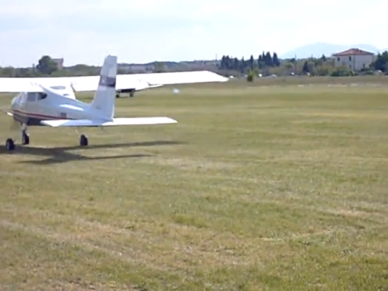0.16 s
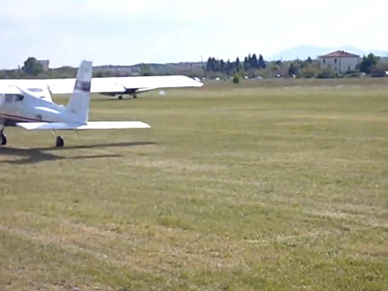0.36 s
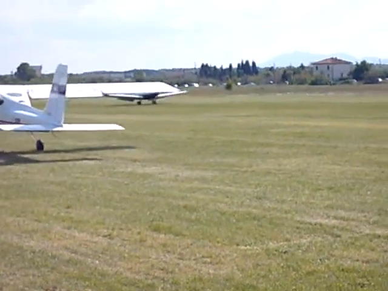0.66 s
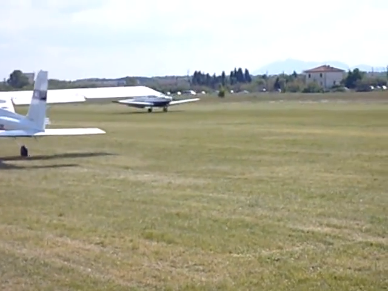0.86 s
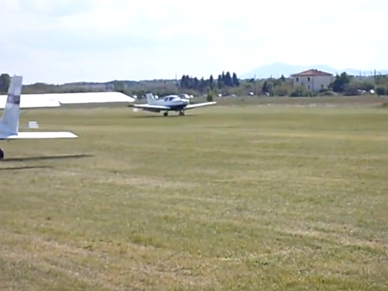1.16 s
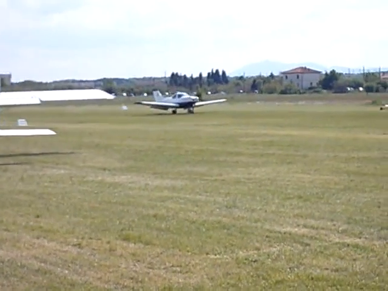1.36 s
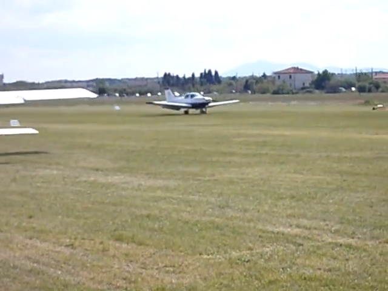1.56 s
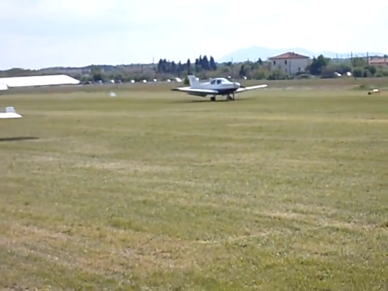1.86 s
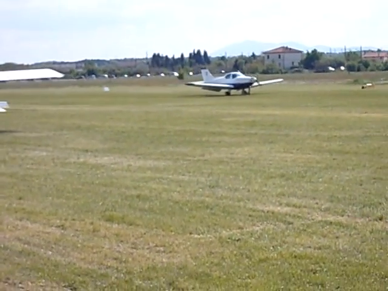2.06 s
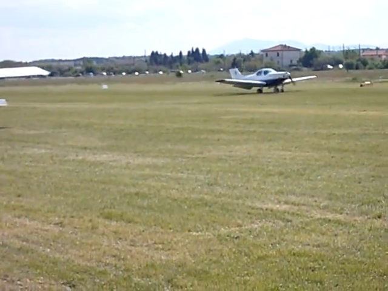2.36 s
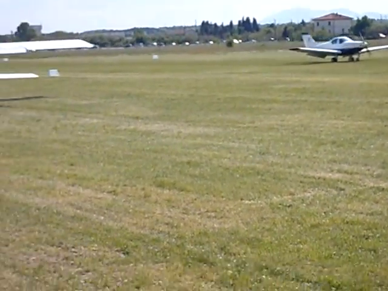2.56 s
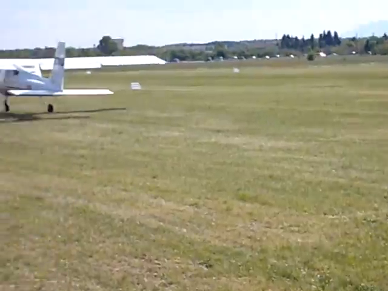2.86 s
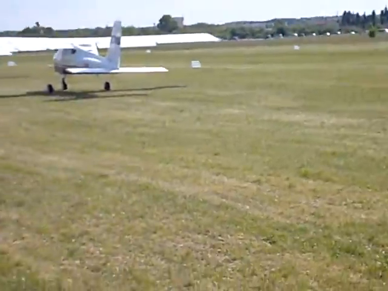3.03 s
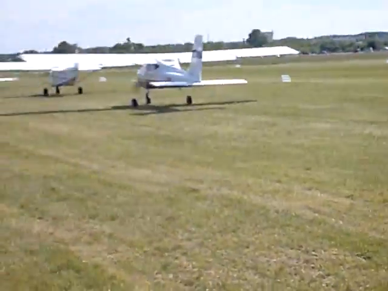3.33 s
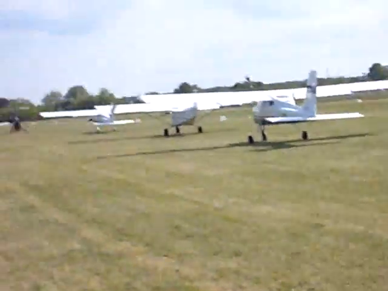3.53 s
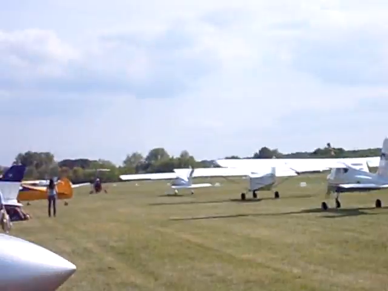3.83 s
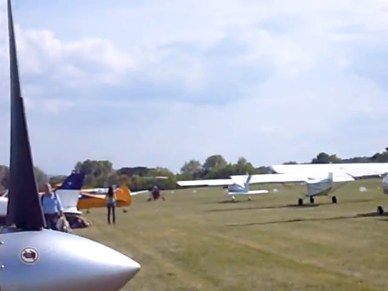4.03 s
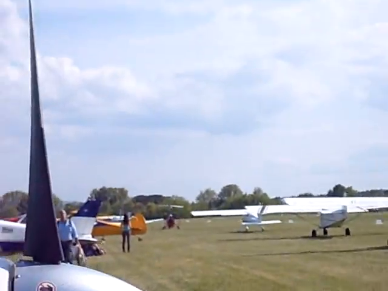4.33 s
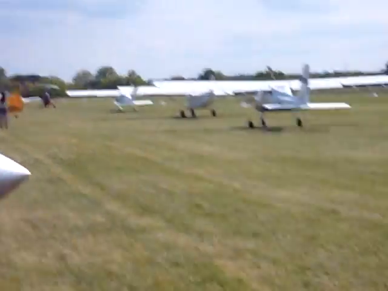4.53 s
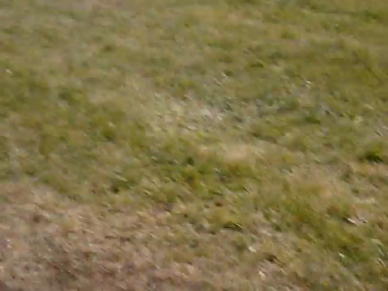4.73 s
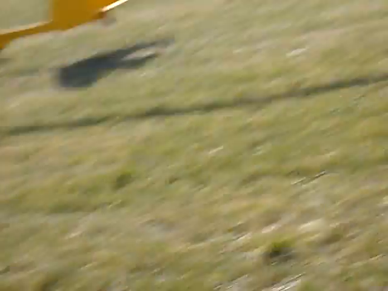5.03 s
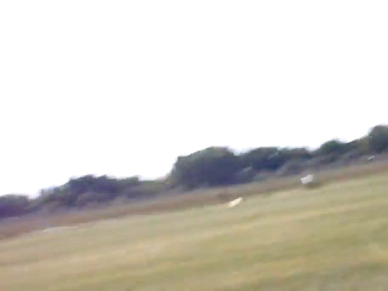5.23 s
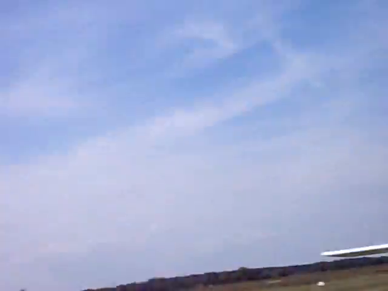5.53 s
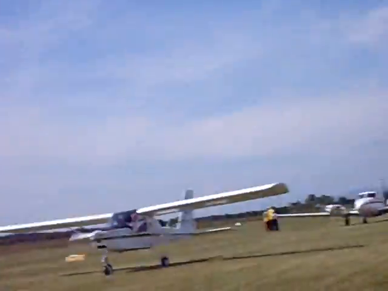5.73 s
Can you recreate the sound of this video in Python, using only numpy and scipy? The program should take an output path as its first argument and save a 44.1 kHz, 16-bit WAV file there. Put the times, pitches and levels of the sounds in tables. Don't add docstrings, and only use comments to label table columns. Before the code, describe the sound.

Steady piston engine hum, uneven exhaust popping and airy propeller roar outdoors; sound cuts out briefly, returns louder, ends on a sharp button click.

```python
import sys
import numpy as np
from scipy import signal
from scipy.io import wavfile
from scipy.ndimage import uniform_filter1d

SR = 44100
rng = np.random.default_rng(int(sys.argv[2]) if len(sys.argv) > 2 else 0)


def inscribe(sig):
    pcm = np.round(np.clip(np.atleast_2d(sig).T, -1, 1) * 32767)
    wavfile.write(sys.argv[1], SR, pcm.astype(np.int16))


def amplitude_ratio(level_db):
    exponent = np.asarray(level_db, float) / 20
    return 10 ** exponent


N = 259749

MUTE_S = (4.51735, 4.88653)
START_TURN = (.063, .01, .29, .41)


def rms_one(x):
    return x / np.sqrt(np.mean(x ** 2) + 1e-20)


def in_time(table):
    s, *columns = np.array(table).T
    return [np.interp(np.arange(N) / SR, s, c) for c in columns]


def bumps(rows):
    return sum(db * np.exp(-((np.arange(N) / SR - s) / length) ** 4) for s, length, db in rows)


def drift(rate):
    step = 40
    r = np.exp(-2 * step * np.pi * rate / SR)
    white = rng.standard_normal(N // step + 2002)
    slow = signal.lfilter([1], [1, -2 * r, r * r], white)[2000:]
    return np.interp(np.arange(N) / step, np.arange(len(slow)), rms_one(slow))


def ring(clicks, hz, t60):
    r = amplitude_ratio(-60 / (t60 * SR))
    w = 2 * np.pi * hz / SR
    return signal.lfilter([0, np.sin(w)], [1, -2 * r * np.cos(w), r * r], clicks + 1e-18)


def turning(hz, wobble):
    return np.cumsum(hz * (1 + wobble * drift(3))) / SR


def tone(turns, db, flutter_db):
    return np.sqrt(2) * amplitude_ratio(db + flutter_db * drift(3.6)) * np.sin(2 * np.pi * turns)


def orders_of(turns, orders, swell_db, flutter_db):
    return sum(tone(k * turns + rng.random() * (k != 2), db + swell_db, flutter_db) for k, db in orders)


def puffs(turns, depth_db, sharp):
    strength = np.exp(0.35 * rng.standard_normal(400))[turns.astype(int) % 400]
    return rms_one(amplitude_ratio(depth_db * strength * np.exp(-sharp * (turns % 1))))


def near_engine(hz, swell_db):
    # multiple of the firing rate, level in dB.
    near_orders = [(1.25, -62), (1.5, -63), (2.5, -62), (2.75, -61), (3, -55.5), (3.75, -65), (4, -61)]
    # time in s, length in s, gain in dB.
    gear_swells = [(.4, .28, 8), (1.5, .4, 8), (2.48, .17, 13.5), (2.9, .18, 14.5), (3.3, .2, 9),
                   (5.3, .33, 9), (5.4, .65, 15)]
    # time in s, mesh frequency in Hz, level in dB.
    far_gear = [(1.7, 4080, -78), (2.0, 4092, -62), (2.4, 4098, -69), (2.65, 4100, -60), (3.3, 4082, -70),
                (3.7, 4113, -62), (3.95, 4105, -72), (4.3, 4116, -63), (4.9, 4190, -65), (5.89, 4140, -64)]
    mesh_per_firing, faint_gear_db = 52.5, -73
    upper_follows = 0.55

    turns = turning(hz, 0) + START_TURN[0]
    uneven = 0.068 * np.sin(2 * np.pi * (turns / 4 + START_TURN[3]))
    hum = tone(turns, -43.7, 0.3) + tone(2 * turns + 0.41 + uneven, -41.9, 0.3)
    for k, db in near_orders:
        hum += tone(k * turns + rng.random(), db + upper_follows * (k - 1) * swell_db, 1.4)

    near_gear = (mesh_per_firing * hz, faint_gear_db + bumps(gear_swells))
    whine = 0
    for mesh_hz, mesh_db in (near_gear, in_time(far_gear)):
        mesh = tone(turning(mesh_hz, 0.001), mesh_db, 1.0)
        whine += mesh * (1 + 0.5 * drift(120))
    return hum + whine * puffs(turns / 2, 3.0, 3.0)


def throbbing_propeller(hz, swell_db):
    # time in s, pop level in dB, side-on share from 0 to 1.
    heading = [(0, -48, 0), (.5, -49, 0.33), (1.3, -44, 0), (2, -45.5, .6), (2.4, -45.5, 0.56),
               (3, -50, 0.87), (3.8, -45.5, 0.76), (4.5, -51, 0.9), (4.9, -48, 1.1), (5.2, -43.5, 0.98),
               (5.4, -50, 0.1), (5.89, -58, .1)]
    # time in s, dB over the usual pop.
    bangs = [(.572, 4.5), (.637, 10), (1.376, 3), (1.397, 9), (1.419, 11), (1.464, -0.5), (2.4, 6),
             (3.83, 5), (5.195, 7)]
    # multiple of the blade rate, level in dB.
    throb_orders = [(1, -61.5), (2, -64), (3, -63), (4, -60), (5, -61), (6, -60), (7, -60), (8, -67)]
    blades_per_firing = 0.6172
    throb_follows = 0.3
    dull_per_side, cowl_db, cowl_rise_db = 0.89, -69.5, 18.5

    pop_db, side = in_time(heading)
    front = 1 - dull_per_side * side
    firing = turning(blades_per_firing * hz, 0) + START_TURN[2]
    strength = amplitude_ratio(1.2 * rng.standard_normal(300))[firing.astype(int)]
    pops = strength * np.diff(np.floor(firing), prepend=0)
    pops += 0.027 * rng.standard_normal(N)
    for s, extra_db in bangs:
        pops[round(s * SR)] += amplitude_ratio(extra_db)

    bright = ring(ring(pops, 817, 0.029), 1020, 0.02)
    dull = ring(ring(pops, 640, 0.026), 645, 0.0097)
    upper = ring(ring(pops, 1520, 0.027), 1580, 0.013)
    resonance = np.clip(front, 0, 1) * bright + np.clip(1 - front, 0, 1) * dull
    resonance = rms_one(resonance) + amplitude_ratio(-7.5) * rms_one(upper)

    hiss = rng.standard_normal(N) * puffs(firing, 7.0, 3.0)
    cowl = rms_one(ring(ring(hiss, 2540, 0.011), 2720, 0.0065))
    orders = [(k, db + throb_follows * k * swell_db) for k, db in throb_orders]
    hum = orders_of(firing, orders, 0, 2.0)
    sound = hum + amplitude_ratio(pop_db - 6.0) * resonance + amplitude_ratio(cowl_db + cowl_rise_db * side) * cowl
    return sound, firing


def grass_gaps():
    # Hz from, Hz to, depth from in dB, depth to in dB, middle of the glide in s.
    before_mute = [
        (531, 308, 3, 2, 1.1),
        (2170, 2060, -0.9, 7.5, 2.74),
        (5800, 6300, 5.5, 0.5, 1.7),
    ]
    after_mute = [
        (450, 750, 4, 10, 5.48),
        (2150, 3760, 8, 0.1, 5.3),
        (4200, 6450, 11, 3, 5.03),
    ]
    s = np.arange(0, N, 64) / SR

    def glide(row, length_s):
        hz0, hz1, db0, db1, mid = row
        share = (1 + np.tanh((s - mid) / length_s)) / 2
        return [hz0 + (hz1 - hz0) * share, db0 + (db1 - db0) * share]

    return [np.where(s < MUTE_S[1], glide(early, 1.3), glide(late, 0.21))
            for early, late in zip(before_mute, after_mute)]


def air_noise(spectrum, patchy_db, step=1 / 4):
    gap_widths = (0.48, 0.13, 0.13)
    hz_points, db_points = np.transpose(spectrum)
    gaps = grass_gaps()
    octaves = np.log2(min(hz_points[-1], 14000) / hz_points[0])
    edges = hz_points[0] * 2 ** np.arange(0, octaves + step / 2, step)
    white = rng.standard_normal((2, N))
    out = 0
    for k, (low, high) in enumerate(zip(edges, edges[1:])):
        hz = np.sqrt(low * high)
        gap_db = 0
        for (gap_hz, db), width in zip(gaps, gap_widths):
            gap_db = gap_db + db * np.exp(-(np.log(hz / gap_hz) / width) ** 2)
        gap_db = np.repeat(gap_db, 64)[:N]
        level_db = np.interp(np.log(hz), np.log(hz_points), db_points)
        gain_db = level_db + patchy_db * drift(6.7) - gap_db
        band = signal.butter(2, [low, high], "band", fs=SR, output="sos")
        out = out + amplitude_ratio(gain_db) * signal.sosfilt(band, white[k % 2])
    return out / np.sqrt(uniform_filter1d(out ** 2, SR // 2))


def wash(firing, swell_db):
    # frequency in Hz, density in dB per Hz.
    rumble = [(28, -28.5), (40, -14), (60, -6.5), (85, 4.5), (108, -20.5), (135, 1), (200, -1), (280, -0.5),
              (400, -15), (500, -18)]
    roar = [(240, -36.5), (400, 4.5), (414, -10.5), (449, -3), (641, -2), (774, -1), (1390, -5.5),
            (1550, -7), (2000, -12), (2600, -39.5), (4400, -120)]
    rush = [(1000, -26.5), (1700, 1), (2120, -0.5), (2380, 1), (3960, -3.5), (4510, -18.5), (5300, -28),
            (6890, -47), (11700, -120)]
    hiss = [(4000, -1), (4800, -4.5), (5240, -2.5), (6200, -8), (6900, -6.5), (8000, -9.5), (9000, 0),
            (10000, -8.5), (11500, 0)]
    # level in dB at mean aim, share of the swell.
    layers = [
        (-43.5, 0.44),
        (-45.5, 0.67),
        (-49, 1.42),
        (-57.5, 0.86),
    ]
    # time in s, length in s, gain in dB.
    gusts = [(.55, 0.18, 3), (2.2, 0.13, -5), (2.8, 0.1, 0.5), (3.5, 0.14, 4.5), (5.28, 0.11, 4.5),
             (5.65, 0.17, 4)]
    # time in s, length in s, hiss gain in dB.
    blasts = [
        (0, 0.15, 2),
        (5.28, 0.19, 2.5),
    ]

    rumble_db, roar_db, rush_db, hiss_db = (db + share * swell_db for db, share in layers)
    rush_db = rush_db + 0.13 * (np.arange(N) - N / 2) / SR
    gust_db = bumps(gusts) + 1.2 * drift(2.5)
    out = amplitude_ratio(rumble_db - 2.5 + gust_db) * air_noise(rumble, 1.5)
    out += amplitude_ratio(roar_db + 2.05) * air_noise(roar, 0.71) * puffs(firing, 3.6, 4.5)
    out += amplitude_ratio(rush_db + 1.46) * air_noise(rush, 1.0, step=1 / 6) * puffs(firing, 3.0, 4.0)
    return out + amplitude_ratio(hiss_db + 5.0 + bumps(blasts)) * air_noise(hiss, 0.98, step=1 / 6)


def ticking():
    # time in s, level in dB.
    tick_levels = [(0, -55), (.15, -60.5), (.3, -61.5), (.7, -78), (.8, -56), (.95, -58), (1.02, -60.5),
                   (1.1, -63.5), (1.6, -85)]
    rate_hz, first_s, decay_s = 38.1, -0.003, 0.0035
    turns = (np.arange(N) / SR - first_s) * rate_hz + 1
    strength = amplitude_ratio(1.6 * rng.standard_normal(300))[turns.astype(int)]
    burst = strength * np.exp(-(turns % 1) / rate_hz / decay_s) * rng.standard_normal(N)
    band = signal.butter(2, [6800, 10800], "band", fs=SR, output="sos")
    return amplitude_ratio(in_time(tick_levels)[0] + 1.5) * rms_one(signal.sosfilt(band, burst))


def buttons():
    # time in s, peak in dB, share of the low ring in dB.
    clicks = [
        (3.528, -40.5, 3),
        (4.4283, -36.5, 8),
        (5.7929, -40, 4),
        (5.86, -2.5, -14.5),
    ]
    # frequency in Hz, level in dB, 60 dB decay time in s.
    spring_modes = [(9200, -4, 0.0025), (10270, 5.5, 0.0023), (7530, -14.5, 0.01), (6400, -3, .005)]
    # frequency in Hz, level in dB, 60 dB decay time in s.
    body_modes = [(3540, 1, 0.0072), (4030, 0, 0.0046), (2980, -18.5, .006), (2340, -13, 0.0075)]
    snap, knock = np.zeros((2, N))
    for s, db, low_db in clicks:
        snap[round(s * SR)] = amplitude_ratio(db)
        knock[round((s + 0.0007) * SR)] = amplitude_ratio(db + low_db)
    high = sum(amplitude_ratio(db) * ring(snap, hz, t60) for hz, db, t60 in spring_modes)
    low = sum(amplitude_ratio(db) * ring(knock, hz, t60) for hz, db, t60 in body_modes)
    out = amplitude_ratio(-20) * ring(ring(high, 9170, 0.0013), 9300, 0.001)
    out += amplitude_ratio(-14.5) * ring(low, 3700, 0.0016)
    return out + amplitude_ratio(-6.5) * ring(knock, 7300, 0.0044)


def other_engines():
    # time in s, steady shaft in Hz, twin shaft in Hz.
    shafts = [(0, 41.36, 41.57), (1.5, 41.565, 42.167), (3, 41.557, 42.492), (4.5, 41.338, 41.915),
              (4.7, 41.872, 43.105), (4.9, 41.506, 42.74), (5.89, 41.589, 42.37)]
    # multiple, level in dB.
    steady_orders = [(1, -62), (2, -50.5), (3, -58), (4, -55), (5, -56.5), (6, -59.5), (8, -62)]
    # multiple, level in dB.
    twin_orders = [(2, -50.5), (3, -60.5), (4, -53)]
    # multiple, level in dB.
    slow_orders = [(3, -54.5), (4, -55.5), (5, -70), (6, -70), (7, -62.5), (8, -70.5)]
    # Hz at the start, Hz at the end, level in dB.
    drones = [(89.5, 92, -57), (72.8, 72.7, -59), (155, 159.5, -60), (198, 201, -60), (209, 211, -61)]
    steady_hz, twin_hz = in_time(shafts)
    out = orders_of(turning(steady_hz, 0) + START_TURN[1], steady_orders, 0, 0.5)
    out += orders_of(turning(twin_hz, 0) + START_TURN[1], twin_orders, 0, 0.5)
    out += orders_of(turning(33, 0.004), slow_orders, -6.0, 3.2)
    for hz0, hz1, db in drones:
        out += tone(turning(np.linspace(hz0, hz1, N), 0.0044), db, 1.5)
    return out


def breeze():
    band = signal.butter(4, [38, 62], "band", fs=SR, output="sos")
    low = signal.sosfilt(band, rng.standard_normal(N))
    return amplitude_ratio(-60 + 2.5 * drift(8)) * rms_one(low)


def scene():
    # time in s, firing rate in Hz.
    near_firing = [(0.0, 73.31), (0.45, 74.33), (0.95, 73.07), (1.2, 74.06), (1.6, 76.12), (1.95, 76.46),
                   (2.35, 76.5), (2.65, 76.52), (2.95, 76.23), (3.22, 76.78), (3.5, 76.5), (3.85, 76.78),
                   (4.5, 76.72), (4.7, 77.26), (4.9, 77.28), (5.05, 77.46), (5.3, 77.17), (5.89, 77.28)]
    # time in s, level of wash and roar in dB.
    aim = [(0, -46.5), (.3, -48), (.7, -48), (1.4, -46.5), (2, -46.5), (2.6, -46), (3.2, -47), (3.7, -46.5),
           (4.2, -47.5), (4.5, -45.5), (4.9, -43), (5.05, -43.5), (5.25, -42), (5.5, -43), (5.7, -43),
           (5.89, -44.5)]
    hz, aim_db = in_time(near_firing)[0], in_time(aim)[0]
    swell_db = aim_db - aim_db.mean()
    throb, firing = throbbing_propeller(hz, swell_db)
    engines = near_engine(hz, swell_db) + throb + other_engines()
    return (engines + wash(firing, swell_db) + ticking() + buttons() + breeze())[None]


def low_pass(x):
    return signal.sosfilt(signal.butter(12, 12660, fs=SR, output="sos"), x)


def record(dry):
    lowpass = signal.butter(6, 10300, fs=SR, output="sos")
    half = signal.resample_poly(signal.sosfilt(lowpass, dry), 1, 2, axis=1)
    s = 2 * np.arange(half.shape[1]) / SR
    half = half * ((s < MUTE_S[0]) | (s > MUTE_S[1]))
    leaky = signal.firwin(65, 0.5, window=("kaiser", 9))
    full = signal.resample_poly(half, 2, 1, axis=1, window=leaky)
    return low_pass(full[:, :N])


dry = scene()
out = record(dry)
inscribe(out)
```